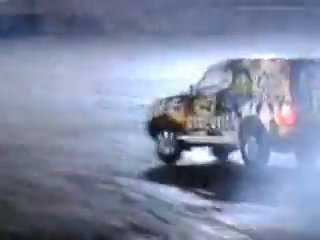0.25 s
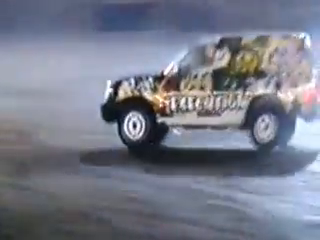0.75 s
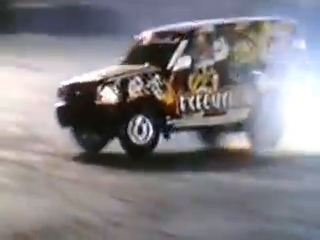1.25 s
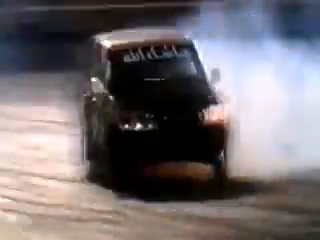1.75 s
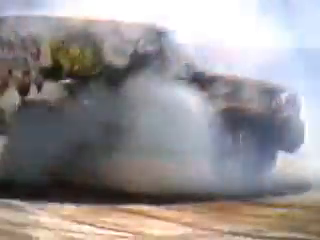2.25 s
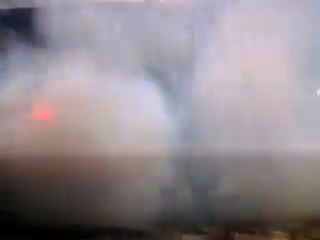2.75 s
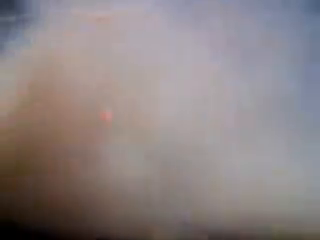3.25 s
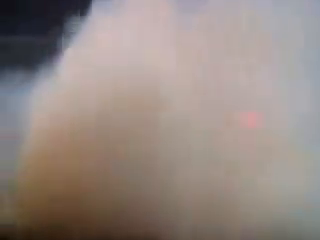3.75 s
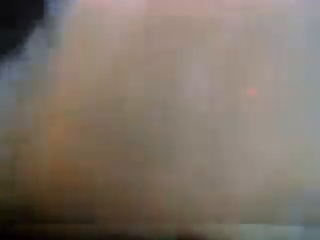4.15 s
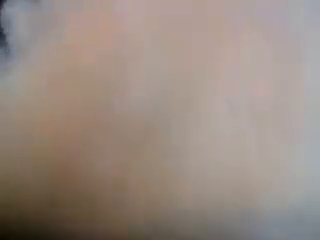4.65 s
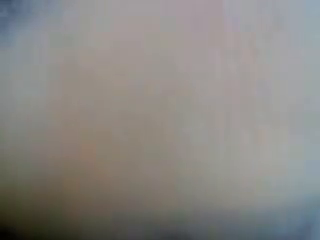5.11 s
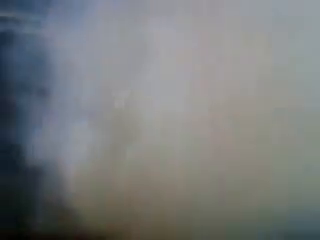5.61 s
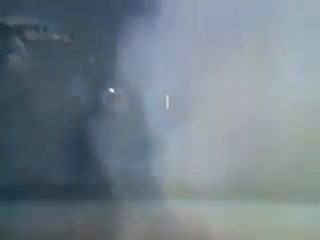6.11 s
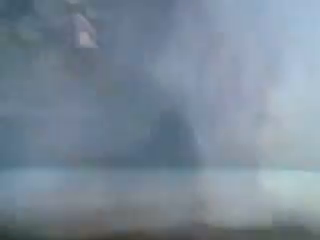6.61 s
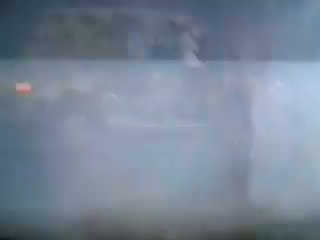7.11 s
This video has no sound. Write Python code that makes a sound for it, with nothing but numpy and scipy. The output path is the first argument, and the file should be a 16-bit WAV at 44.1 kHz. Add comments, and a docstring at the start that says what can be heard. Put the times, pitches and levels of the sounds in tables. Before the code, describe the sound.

Off-roader spinning donuts in an echoing arena: rasping revs, wavering tyre squeal and grinding rubber, a crackle of backfires, then a purer, rising skid.

```python
"""Off-roader spinning donuts

A six-cylinder engine climbs, holds high revs, then drops to a coast; noise bursts make its backfires.
Uneven firing pulses ring the exhaust, and sines locked to the crank sing above them under power.
Two driven tyres squeal as wavering stick-slip tones, hoarse at first and purer as they slow down.
Filtered noise makes the grinding rubber, the scrapes and the arena; the stands echo the engine,
squeals and backfires. A small phone microphone thins it all, with faint ticks and rumble."""
import sys
import numpy as np
from scipy import signal
from scipy.fft import rfft, irfft
from scipy.io import wavfile

SR = 44100
rng = np.random.default_rng(int(sys.argv[2]) if len(sys.argv) > 2 else 0)


def digitize_waveform(pressure):
    """Quantize a signal to 16-bit integers and store it at the path in sys.argv[1].

    Rows of a 2-D input are taken as channels; values are limited to [-1, 1].
    """
    field = np.atleast_2d(pressure).T
    bounded = np.clip(field, -1, 1)
    quanta = np.round(bounded * 32767).astype(np.int16)
    wavfile.write(sys.argv[1], SR, quanta)


N = 325017
T = np.arange(N) / SR
FREQS = np.maximum(np.fft.rfftfreq(16384, 1 / SR), 1)  # filter design grid, Hz

# The donut under power, as control levels that each layer trims. Each row: time in seconds,
# exhaust in dB, rasp and squeal in dB, rubber grinding on asphalt in dB.
DONUT = [(0.33, -40, -39.5, -68), (0.6, -35.5, -31, -41), (0.8, -46.5, -31.5, -39.5),
         (1.2, -44.5, -28.5, -32), (1.55, -33, -26, -35.5), (1.68, -32.5, -25, -29.5),
         (1.82, -36.5, -23.5, -36), (2.09, -36.5, -26.5, -31.5), (2.31, -35, -26, -34),
         (2.44, -28.5, -27, -39.5), (2.62, -29, -23.5, -38.5), (2.73, -28, -20.5, -36),
         (2.92, -27.5, -25.5, -39.5), (3.16, -26, -23, -33.5), (3.28, -36.5, -25.5, -32.5),
         (3.5, -31, -20.5, -32), (3.65, -35, -28.5, -33), (3.9, -31, -23, -33.5), (4.14, -27, -23.5, -35.5)]
# The slide off the throttle, as control levels that each layer trims. Each row: time in seconds,
# squeal and coasting engine in dB, rubber grinding on asphalt in dB.
SLIDE = [(4.68, -43.5, -65), (4.85, -34, -49), (5.254, -28.5, -46), (5.592, -26, -42), (6.078, -34, -51),
         (6.138, -38, -79), (6.22, -37, -60)]

# The level starts slightly raised and settles as the throttle opens.
OPEN_S, OPEN_TAKES_S, START_BOOST_DB = 0.31, 0.19, 2
# The throttle shuts: a sudden drop, then a steady dying away.
LIFT_S, LIFT_FALL_S, RUNDOWN_DB_PER_S = 4.155, 0.0082, 35
SLIDE_S, SLIDE_RISE_S, SLIDE_FADE_DB_PER_S = 4.6, 0.11, 7
GRIP_S, GRIP_TAKES_S = 6.2, 0.1  # the tyres find grip
FLUTTER_DB = 2.4  # spread of the squeal's quick level flutter


def engine(scatter_db=5.0, jitter=0.009, gas_db=-12, pipe_db=-7.5, bank_db=-9.5, rasp_db=-3.5,
           throb_db=-0.5, growl_db=2.0, crank_wobble=0.0012):
    """Six uneven firings a cycle and puffs of gas ring the exhaust; returns this roar and the singing orders."""
    # Cylinders in firing order. Each row: lateness in firing intervals, mean strength in dB.
    cylinders = [(0.054, -7), (0.096, -0.5), (-0.07, -6.5), (0.063, 0), (-0.033, 1), (-0.03, -1.5)]
    # Exhaust resonances. Each row: frequency in Hz, width in Hz, relative level in dB.
    pipe_modes = [(259, 24, -10.5), (354, 61, -3.5), (542, 95, 1.5), (646, 128, 4.5), (853, 22, -8)]
    # Raspy upper resonances. Each row: frequency in Hz, width in Hz, relative level in dB.
    rasp_modes = [(1006, 184, 1.3), (1290, 96, 3.9), (1515, 250, 7.2), (2148, 175, 3.5)]
    # Orders that sing whenever the engine pulls. Each row: multiple of the cycle rate, relative level in dB.
    bank_orders = [(8, -14.5), (9, -7), (10, -20.5), (14, -5.5), (16, -8.5), (17, -6), (19, -11),
                   (20, -5.5), (21, -4.5), (23, -7), (24, -10.5), (27, -3.5), (28, -2.5), (29, -1),
                   (30, -8.5), (31, -1.5), (32, -3), (33, 0), (35, -4.5), (41, -1.5)]

    cycle_hz = revs()
    exhaust, bright, coast_exhaust, coast_bright = engine_gains()
    cycles = np.cumsum(cycle_hz * (1 + crank_wobble * walk(25))) / SR
    count = len(cylinders)
    phase = count * cycles
    k = np.arange(1, int(phase[-1]) - 1)
    late, strength_db = np.array(cylinders)[k % count].T
    chance = np.clip(rng.standard_normal((len(k), 2)), -2, 2)
    at = np.interp(k + late + jitter * chance[:, 0], phase, np.arange(N))
    size = undb(strength_db + scatter_db * chance[:, 1])
    # each pulse is shared between two samples, to land between them
    i, part = at.astype(int), at % 1
    pulses = np.bincount(i, size * (1 - part), N) + np.bincount(i + 1, size * part, N)
    # the puffs keep the even firing pace
    gas = rng.standard_normal(N) * np.exp(-(phase % 1))
    drive = unit(pulses / np.sqrt(cycle_hz)) + undb(gas_db) * unit(gas)
    pipe = undb(pipe_db) * unit(shape(drive, resonance(pipe_modes))) * (exhaust + coast_exhaust)
    rasp = undb(rasp_db) * swaying(drive, rasp_modes) * (bright + coast_bright)
    # the rasp swells once a cycle, unevenly
    throb = unit(undb(throb_db * np.cos(2 * np.pi * cycles) + growl_db * walk(30)))
    bank = undb(bank_db) * orders(cycles, bank_orders) * bright
    return pipe + rasp * throb, notes(cycles) + blares(cycles) + bank


def revs(coast_hz=27.31, sag_hz_per_s=0.9, spin_down_s=0.22):
    """Four-stroke cycles per second: held up by the throttle, then sinking to a slow coast."""
    # Engine speed under power. Each row: time in seconds, cycle rate in Hz.
    power_revs = [(0.3, 32.69), (0.42, 33.2), (0.66, 33.41), (0.78, 33.97), (1.02, 35.82), (1.14, 37.43),
                  (1.26, 37.89), (1.5, 38.49), (1.62, 38.67), (1.74, 40.9), (1.86, 42.63), (1.98, 44.0),
                  (2.1, 45.66), (2.22, 47.12), (2.34, 48.32), (2.46, 47.48), (2.58, 48.3), (2.7, 48.75),
                  (2.82, 48.16), (2.94, 47.03), (3.06, 47.7), (3.18, 47.57), (3.3, 46.82), (3.42, 46.64),
                  (3.54, 46.67), (3.66, 46.15), (3.78, 45.89), (3.9, 45.2), (4.02, 43.99), (4.15, 44.1)]
    coast = coast_hz - sag_hz_per_s * since(LIFT_S)
    return coast + (curves(power_revs)[0] - coast) * np.exp(-since(LIFT_S) / spin_down_s)


def engine_gains(exhaust_db=0.0, rasp_db=-2, exhaust_drop_db=-10, rasp_drop_db=-19,
                 coast_exhaust_db=-16, coast_rasp_db=-9, idle_db=-58):
    """Gains of the exhaust and of its rasp under power, then of both while coasting."""
    pipe_db, roar_db, _ = curves(DONUT)
    coast = undb(curves(SLIDE)[0]) * sliding()
    idle = undb(idle_db) * ramp(SLIDE_S, SLIDE_RISE_S)
    return (undb(pipe_db + exhaust_db) * throttle(exhaust_drop_db),
            undb(roar_db + rasp_db) * throttle(rasp_drop_db),
            undb(coast_exhaust_db) * coast + idle,
            undb(coast_rasp_db) * coast)


def swaying(x, modes, shift=0.021):
    """Resonances that wander a little up and down in pitch as the car swings round."""
    def tuned(ratio):
        return shape(x, resonance([(hz * ratio, width, db) for hz, width, db in modes]))

    lower, upper = tuned(1 - shift), tuned(1 + shift)
    share = (1 + np.tanh(2 * walk(11))) / 2
    return unit(lower * (1 - share) + upper * share)


def orders(cycles, table, spread=0.19, smear=0.055, flutter_db=2.4, steady_below=16):
    """Sines locked to the crank, each with its own lag (cycles); low multiples are proportionally steadier."""
    out = 0
    for k, db in table:
        unsteady = min(k / steady_below, 1)
        phase = round(k) * cycles + spread * rng.standard_normal() + unsteady * smear * walk(45)
        level = undb(db + unsteady * flutter_db * walk(22.06))
        out = out + level * np.sin(2 * np.pi * phase)
    return unit(out)


def notes(cycles, trims_db=(-0.5, -4.0, -0.5, -0.5), drop_db=-14):
    """The four strongest orders take turns as the revs sweep them through the exhaust's resonances."""
    # The firing note and strong orders above it, as multiples of the cycle rate.
    note_orders = (6, 12, 15, 18)
    # Turns of the notes. Each row: time in seconds, then the level of each note in dB before its trim.
    note_levels = [(0.3, -61, -55, -62, -52), (0.55, -54.5, -67, -69.5, -65.5),
                   (0.75, -51, -74, -47.5, -38), (0.95, -51.0, -57.5, -50.5, -41),
                   (1.17, -48, -62, -61.5, -55.5), (1.35, -58, -44.5, -42, -44.0),
                   (1.6, -48.5, -51, -37, -44), (1.72, -55, -49, -32, -46), (1.9, -56.5, -45, -34.5, -54),
                   (2.1, -56, -41.5, -42.5, -70), (2.3, -56.5, -29.5, -53.5, -48),
                   (2.419, -53, -49.5, -55.5, -57), (2.6, -47, -29.5, -43, -46),
                   (2.8, -49, -38.5, -42, -47.5), (2.95, -49.5, -54.5, -44.5, -37),
                   (3.2, -42, -34.5, -43.5, -54), (3.4, -48.0, -60, -32.5, -41),
                   (3.6, -51.5, -40.5, -40, -42), (3.8, -54, -42, -37.5, -48.5),
                   (4.031, -45, -33, -32.5, -48.5), (4.15, -51, -38, -47, -50)]
    levels = zip(note_orders, curves(note_levels), trims_db)
    mix = sum(orders(cycles, [(k, 0)]) * undb(db + trim_db) for k, db, trim_db in levels)
    return mix * throttle(drop_db)


def blares(cycles, drop_db=-20):
    """High orders blare out at the peak of the revs, and again as the tailpipe swings past."""
    # Orders at the peak. Each row: multiple of the cycle rate, relative level in dB.
    peak_orders = [(9, -6), (20, 0), (21, 5.5), (29, -11), (32, -9), (33, -9.5)]
    # Orders from the tailpipe. Each row: multiple of the cycle rate, relative level in dB.
    tailpipe_orders = [(8, -15), (14, -14.5), (20, -8.5), (22, -6), (23, -4.5), (27, -8), (28, -11.5),
                       (29, 2.5), (30, -17), (32, -6.5), (33, -3.5), (34, -13), (35, -3.5), (36, -13.5),
                       (43, -14), (44, -3), (45, -8), (47, -9.5), (48, -17.5), (50, -14)]
    peak = orders(cycles, peak_orders) * undb(-32) * swell(2.63, 0.27)
    tailpipe = orders(cycles, tailpipe_orders) * undb(-24.5) * swell(3.296, 0.68)
    return (peak + tailpipe) * throttle(drop_db)


def throttle(drop_db):
    """Gain of what the throttle drives: it settles, holds, then drops suddenly and runs down."""
    boost_db = START_BOOST_DB * (1 - ramp(OPEN_S, OPEN_TAKES_S))
    return undb(boost_db + drop_db * ramp(LIFT_S, LIFT_FALL_S) - RUNDOWN_DB_PER_S * since(LIFT_S))


def sliding():
    """Gain of the slide: it sets in after the throttle shuts and fades once the tyres grip."""
    return ramp(SLIDE_S, SLIDE_RISE_S) * undb(-SLIDE_FADE_DB_PER_S * since(GRIP_S))


def tyres():
    """The two driven tyres, each on its own stick-slip note."""
    # Stick-slip rate while spinning. Each row: time in seconds, inner tyre in Hz, outer tyre in Hz.
    spin_rates = [(0.5, 986, 1330), (0.72, 930, 1267), (1.05, 948, 1296), (1.45, 1033, 1377),
                  (2.0, 1099, 1329), (2.6, 999.7, 1364), (3.6, 1055, 1353), (4.15, 1006, 1376),
                  (4.75, 1060, 1337), (4.85, 1071, 1398), (5.25, 1031, 1359), (5.55, 1048, 1396),
                  (5.76, 1085, 1445), (5.92, 1057, 1453), (6.12, 971, 1335)]
    # Inner tyre gripping. Each row: time in seconds, rate in Hz, level and overtones in dB before trims.
    inner_grip = [(6.28, 1214, -50.5, -31), (6.302, 1263, -36, -6), (6.379, 1141, -49, -6),
                  (6.46, 1357, -44, -6.5), (6.67, 1447, -39.5, -8), (6.722, 1532, -38.5, 4),
                  (6.82, 1511, -39.5, -2), (6.9, 1540, -37, -4), (6.99, 1511, -42, 2),
                  (7.056, 1517, -68, -8), (7.13, 1518, -64, -8), (7.224, 1552, -52, 7),
                  (7.36, 1543, -61, 0)]
    # Outer tyre gripping. Each row: time in seconds, rate in Hz, level and overtones in dB before trims.
    outer_grip = [(6.29, 1405, -51, -6), (6.334, 1570, -42, -1), (6.44, 1768, -41.5, 7),
                  (6.545, 1863, -44, 4), (6.661, 1765, -48, 8), (6.788, 1750, -45, 5),
                  (6.98, 1731, -44.5, 4), (7.071, 1727, -63, -9), (7.18, 1729, -66, -7),
                  (7.21, 1897, -55, -8), (7.36, 1867, -58, -6)]
    inner_hz, outer_hz = curves(spin_rates)
    inner = tyre(inner_hz, inner_grip, donut_db=-13.0, slide_db=-13.5, grip_db=-1.5,
                 overtone_db=-6.5, slide_overtone_db=1.5, grip_blur=0.9)
    outer = tyre(outer_hz, outer_grip, donut_db=-11.5, slide_db=-7.0, grip_db=2.5,
                 overtone_db=-10.5, slide_overtone_db=2.5, grip_blur=0.3)
    return inner + outer


def tyre(spin_hz, grip, donut_db, slide_db, grip_db, overtone_db, slide_overtone_db, drop_db=-17,
         waver=0.013, shudder_db=2.04, rib_db=-8, rib_split=0.03, rib_waver=0.028,
         spin_blur=0.17, grip_blur=0.55, breakaway_s=0.37):
    """It breaks loose, shudders, slides, then climbs in pitch as it grips; a second tread rib sings beside it."""
    # pitch scatter as a share: hoarse while spinning, clearer in the slide, purer as the slip dies
    spin_scatter, slide_scatter, pure_scatter = 0.027, 0.018, 0.0137
    purer_from_s, purer_takes_s, purer_overtones_db = 5.8, 1.82, -8.5

    grip_hz, bite_db, grip_overtone_db = curves(grip)
    gripping = ramp(GRIP_S, GRIP_TAKES_S)
    slid = ramp(SLIDE_S, SLIDE_RISE_S)
    purity = ramp(purer_from_s, purer_takes_s)

    donut = undb(curves(DONUT)[1] + donut_db) * ramp(0, breakaway_s) ** 2 * throttle(drop_db)
    slide = undb(curves(SLIDE)[0] + slide_db) * sliding()
    gain = (donut + slide) * (1 - gripping) + undb(bite_db + grip_db) * gripping

    hz = (spin_hz + (grip_hz - spin_hz) * gripping) * (1 + waver * walk(18))
    scatter = spin_scatter + (slide_scatter - spin_scatter) * slid + (pure_scatter - slide_scatter) * purity
    bright_db = overtone_db + slide_overtone_db * slid
    bright_db = bright_db + grip_overtone_db * gripping + purer_overtones_db * purity
    blur = spin_blur + (grip_blur - spin_blur) * gripping

    rib = undb(rib_db) * (1 - purity ** 2)
    rib_hz = hz * (1 - rib_split + rib_waver * walk(9))
    ribs = stick_slip(hz, scatter, bright_db, blur) + rib * stick_slip(rib_hz, scatter, bright_db, blur)
    return ribs / np.hypot(1, rib) * gain * undb(FLUTTER_DB * walk(200) + shudder_db * walk(18))


def stick_slip(hz, scatter, overtone_db, blur=0.22, slope_db=-6):
    """Tread blocks stick and slip: a wavering tone whose blurred overtones come and go."""
    # Overtone colour of the squeal. Each row: frequency in Hz, gain in dB before the slope.
    squeal_colour = [(1800, -7), (1980, 0), (2150, 6.5), (2450, 1.5), (2800, -2.5), (3150, -11.5),
                     (3700, -16.5), (4100, -15.5), (4600, -13.5), (5300, -16.5), (6500, -38)]
    phase = 2 * np.pi * np.cumsum(hz * (1 + scatter * walk(170))) / SR
    overtones = 0
    for k in range(2, 6):
        level = undb(slope_db * np.log2(k / 2) + FLUTTER_DB * walk(90))
        blurred = np.sin(k * (phase + blur * walk(260)))
        overtones = overtones + gain_at(k * hz, squeal_colour) * level * blurred
    return np.sqrt(2) * (np.sin(phase) + undb(overtone_db) * overtones)


def howls(scatter=0.022, shudder_db=4.5):
    """Hoarse swells of stick-slip squeal as a tyre takes the car's weight."""
    # Each row: start in seconds, length in seconds, start pitch in Hz, end pitch in Hz,
    # level in dB before the shudder, overtones in dB.
    howl_rows = [(0.66, 0.76, 1250, 1262, -48.5, 4), (1.62, 0.22, 1120, 1097, -42, -5.5),
                 (1.88, 0.11, 1270, 1165, -44.5, 5), (2.03, 0.13, 1240, 1350, -37.5, -0.5),
                 (2.27, 0.13, 1370, 1335, -31, -18.5), (2.685, 0.115, 1550, 1500, -30, -13.5),
                 (5.48, 0.1, 1050, 1050, -38, -5), (5.72, 0.2, 1125, 1081, -42.5, 0.5)]
    hz, overtone_db = glides(howl_rows)
    load = sum(undb(db) * swell(s, length) for s, length, _, _, db, _ in howl_rows)
    return load * stick_slip(hz, scatter, overtone_db, blur=0.15) * undb(shudder_db * walk(35))


def chirps(scatter=0.00833, rise_s=0.0015, fall_s=0.0085):
    """Short, purer stick-slip squeals that start abruptly as the tread suddenly bites."""
    # Each row: start in seconds, length before the fall in seconds, start pitch in Hz, end pitch in Hz,
    # level in dB, overtones in dB.
    chirp_rows = [(6.041, 0.057, 946, 994, -36, -15), (6.299, 0.0597, 1530, 1620, -34, -20),
                  (6.376, 0.021, 1604, 1640, -34, -24), (6.689, 0.057, 1516, 1565, -29.5, -18),
                  (7.134, 0.062, 1527, 1536, -42, -23), (7.208, 0.011, 1573, 1607, -37.5, -23),
                  (7.256, 0.033, 1540, 1530, -41.5, -21)]
    hz, overtone_db = glides(chirp_rows)
    bite = 0
    for s, length, _, _, db, _ in chirp_rows:
        bite = bite + undb(db) * ramp(s, rise_s) * np.exp(-since(s + length) / fall_s)
    return bite * stick_slip(hz, scatter, overtone_db, blur=0.43)


def glides(rows):
    """Pitch and overtone level along a series of squeals."""
    points = []
    for s, length, start_hz, end_hz, _, db in rows:
        points += [(s, start_hz, db), (s + length, end_hz, db)]
    return curves(points)


def backfires(level_db=-8.0, tail_db=-19, tail_s=0.07, rattle_db=5.0, boom_db=-4.5, crack_hz=2900):
    """Unburnt fuel bangs in the exhaust, with a low thump and a bright crack, and rattles under the car."""
    # Each row: start in seconds, burst level in dB before colouring, decay of the burst in seconds,
    # relative level of the low thump in dB, relative level of the bright crack in dB.
    bang_rows = [(0, -21, 0.037, -1.5, 3), (.062, -6.5, 0.021, 1, 1.5), (0.197, -9.5, 0.018, 7, 1),
                 (3.189, -8.5, 0.015, -19.5, -12.5), (3.198, -9, 0.01, -16.5, -9.5),
                 (3.209, -8.5, 0.0046, -17.5, -10), (4.224, -2, 0.0099, -6.5, 0),
                 (4.246, -13.5, 0.0036, -9.5, 5), (4.319, -18.5, 0.017, -9, -4),
                 (4.347, -5, 0.0053, -3.5, -2.5), (4.356, -7.5, 0.0087, -3, -1.5),
                 (4.396, -23, 0.005, -2, 3), (4.44, -17, 0.014, -12, -3.5), (4.455, -15, 0.016, -13, -3),
                 (4.478, -21.5, 0.007, -9.5, 2.5), (4.52, -24.5, 0.064, -2.5, 0)]
    # Colour of the bangs. Each row: frequency in Hz, relative density in dB per Hz.
    bang_colour = [(170, -27.5), (240, -12), (400, -7), (600, 2.5), (800, -1.5), (1000, 1.5), (1450, 5.5),
                   (1800, -1), (2150, 1), (3000, -18), (4000, -17.5), (5200, -14.5), (7000, -32)]
    # The silencer's boom. Each row: frequency in Hz, width in Hz, level in dB before its trim.
    boom_modes = [(260, 142, -2.5)]

    s, db, length, thump_db, crack_db = np.transpose(bang_rows)
    rattle = unit(undb(rattle_db * walk(260)))

    def pops(peaks):
        tails = bursts([(at, peak + tail_db, tail_s) for at, peak in zip(s, peaks)])
        return bursts(zip(s, peaks, length)) + rattle * tails

    bang = edge(pops(db), crack_hz, "low") + edge(pops(db + crack_db), crack_hz, "high")
    colour = unit(gain_at(FREQS, bang_colour))
    boom = colour.max() * undb(boom_db) * shape(pops(db + thump_db), resonance(boom_modes))
    return undb(level_db) * (shape(bang, colour) + boom)


def scrub(donut_db=4, slide_db=6.0, drop_db=-11, grain_db=1.4, judder_db=1.47):
    """Spinning rubber tears over the grit: coloured noise with a grainy, juddering level."""
    # Colour of the grinding. Each row: frequency in Hz, relative density in dB per Hz.
    scrub_colour = [(200, -31), (450, -16), (650, -13), (800, -24), (1300, 8), (1800, -4), (2200, 3),
                    (2700, -8), (3300, -16.5), (5200, -13.5), (7000, -37)]
    grains = rng.standard_normal(N) * undb(grain_db * walk(700) + judder_db * walk(23.97))
    donut = undb(curves(DONUT)[2] + donut_db) * throttle(drop_db)
    slide = undb(curves(SLIDE)[1] + slide_db) * sliding()
    return unit(shape(grains, gain_at(FREQS, scrub_colour))) * (donut + slide)


def scrapes(grain_db=4):
    """Faint, bright bursts of noise that crackle with grit."""
    # Each row: start in seconds, level in dB before the resonances, decay in seconds.
    scrape_rows = [(0.57, -44, 0.042), (0.66, -41.5, 0.09), (4.375, -37.5, 0.072), (4.49, -44, 0.08),
                   (4.562, -46.5, 0.065), (6.283, -46, 0.048), (7.21, -44, 0.052), (7.312, -45.5, 0.022)]
    gritty = bursts(scrape_rows) * unit(undb(grain_db * walk(500)))
    return shape(gritty, resonance([(2690, 940, 13.2), (4940, 1200, 1.2)]))


def stands(x, delay_s=0.013, t60_s=1.1):
    """A diffuse echo from the stands: a decaying noise tail, dulled above 4 kHz."""
    noise = edge(rng.standard_normal(N), 4000, "low", order=1)
    tail = noise * undb(-60 * T / t60_s) * (T > delay_s)
    return signal.fftconvolve(x, tail / np.sqrt(np.sum(tail ** 2)))[:N]


def background(level_db=-49.0):
    """The dull noise of the arena, its level flickering by about 1 dB."""
    # Colour of the arena. Each row: frequency in Hz, relative density in dB per Hz.
    arena_colour = [(71, -86.5), (120, -38.5), (240, -2), (403, -14), (541, -5), (791, -18.5),
                    (1180, -24.5), (1550, 7.5), (1780, -24), (1880, -37), (2390, -12.5), (5310, -27),
                    (6760, -22.5), (7500, -51.5), (9750, -86.5)]
    return unit(shape(rng.standard_normal(N), gain_at(FREQS, arena_colour))) * undb(level_db + walk(21))


def ticks(first_s=0.2615, period_s=0.9396, decay_s=0.000088):
    """Tiny one-sided clicks at a steady pace."""
    # Peak of each tick in turn, in dB before the final low-pass.
    tick_peaks = [-18, -25, -19, -16, -19, -42, -19, -28]
    rows = [(first_s + k * period_s, db, decay_s) for k, db in enumerate(tick_peaks)]
    return bursts(rows, noisy=False)


def bursts(rows, noisy=True):
    """Bursts (start in s, dB, decay in s) that start at once and die away."""
    out, t = np.zeros(N + SR), T[:SR]
    for s, db, decay in rows:
        i = max(int(s * SR), 0)
        out[i:i + SR] += undb(db) * np.exp(-t / decay) * (rng.standard_normal(SR) if noisy else 1)
    return out[:N]


def since(s):
    """Seconds gone by since s, 0 before."""
    return np.maximum(T - s, 0)


def ramp(s, length_s):
    """Rises from 0 at s to 1 over length_s."""
    return np.clip((T - s) / length_s, 0, 1)


def swell(s, length_s):
    """A rounded rise, hold and fall, at half height at s and again length_s later."""
    return 1 / (1 + np.square(np.square(2 * (T - s) / length_s - 1)) ** 2)


def walk(rate):
    """Random wander of rms 1, with rate random points a second joined by straight lines."""
    knots = rng.standard_normal(20000)
    return unit(np.interp(T * rate, np.arange(len(knots)), knots))


def curves(rows):
    """The columns of a table as straight-line controls, one value a sample."""
    s, *columns = np.transpose(rows)
    return [np.interp(T, s, c) for c in columns]


def undb(db):
    """Decibels to gain."""
    return 10 ** (np.asarray(db) / 20)


def unit(x):
    """Scale to rms 1."""
    return x / np.sqrt(np.mean(x ** 2))


def gain_at(hz, points):
    """Gain of a (Hz, dB) spectrum at the given frequencies."""
    f, db = np.transpose(points)
    return undb(np.interp(np.log(hz), np.log(f), db))


def resonance(modes):
    """Gain at FREQS of overlapping resonances (Hz, width in Hz, dB), summed as power."""
    power = 0
    for hz, width, db in modes:
        detuning = hz / width * (FREQS / hz - hz / FREQS)
        power = power + undb(2 * db) / (1 + detuning ** 2) ** 1.75
    return np.sqrt(power)


def shape(x, gain):
    """Causal minimum-phase filter with the given gain at FREQS, by folding the cepstrum."""
    cepstrum = irfft(np.log(gain + 1e-6))
    half = len(cepstrum) // 2
    cepstrum[1:half] *= 2
    cepstrum[half + 1:] = 0
    return signal.oaconvolve(x, irfft(np.exp(rfft(cepstrum)))[:half])[:N]


def edge(x, hz, kind, order=4):
    """High-pass or low-pass."""
    return signal.sosfilt(signal.butter(order, hz, kind, fs=SR, output="sos"), x)


def scene():
    """The car, its echo and the arena."""
    motor, singing = engine()
    squeal = tyres() + howls()
    bites, bangs = chirps(), backfires()
    sent = undb(-4.5) * motor + undb(-14.5) * singing + undb(-8.5) * squeal
    sent = sent + undb(-15.0) * bites + undb(-11.5) * bangs
    car = motor + singing + squeal + bites + bangs + scrub() + scrapes()
    return (car + stands(sent) + background())[None]


def record(dry):
    """The phone cuts the bass and the top and has a peaky housing; faint ticks and a rumble join in."""
    # Microphone housing. Each row: frequency in Hz, width in Hz, gain in dB.
    housing = [(3420, 44, -5.5), (3850, 400, 5), (4405, 350, -7), (5120, 580, 3)]
    housing_db = sum(db * np.exp(-(2 * (FREQS - hz) / width) ** 2) for hz, width, db in housing)
    x = edge(shape(dry[0], undb(housing_db)), 168.0, "high", order=12) + ticks()
    # faint rumble of the electronics, below 28 Hz
    x = x + undb(-75) * unit(edge(rng.standard_normal(N), 28, "low", order=2))
    top_cut = signal.ellip(8, .2, 70, 7250, fs=SR, output="sos")
    return signal.sosfilt(top_cut, x)[None]


dry = scene()
out = record(dry)
digitize_waveform(out)
```